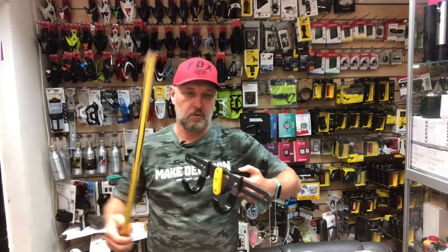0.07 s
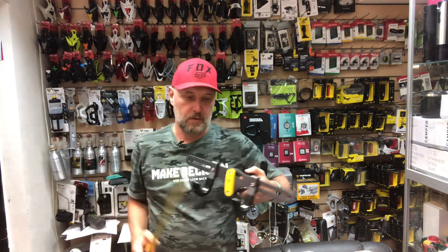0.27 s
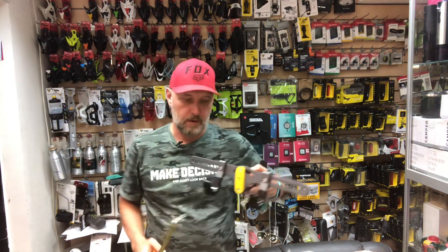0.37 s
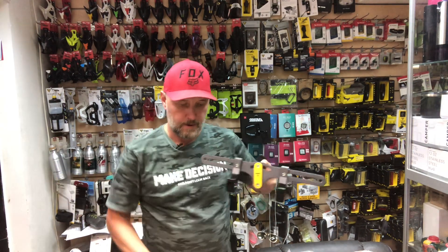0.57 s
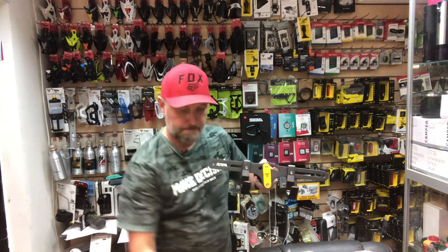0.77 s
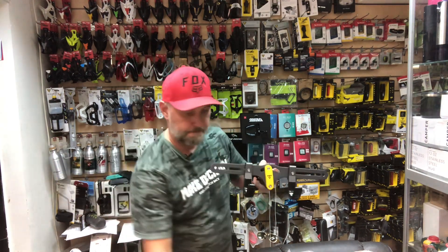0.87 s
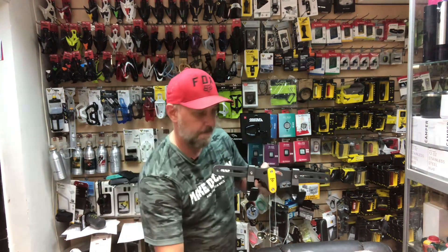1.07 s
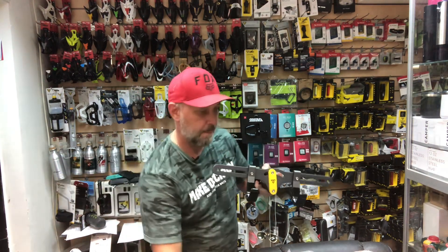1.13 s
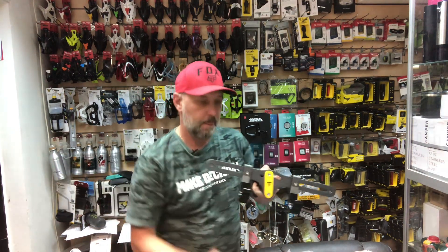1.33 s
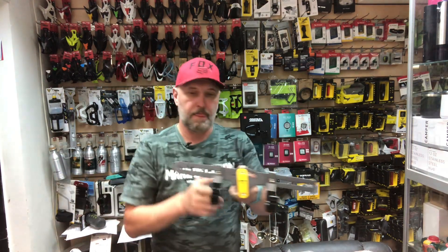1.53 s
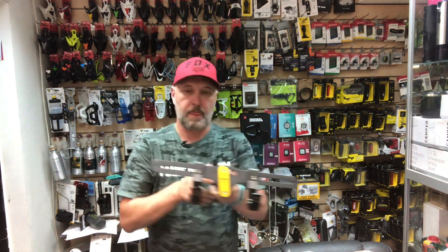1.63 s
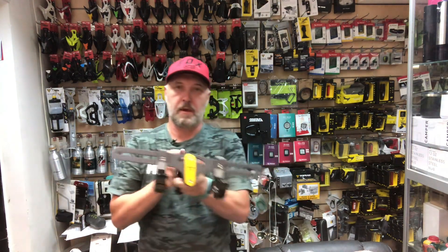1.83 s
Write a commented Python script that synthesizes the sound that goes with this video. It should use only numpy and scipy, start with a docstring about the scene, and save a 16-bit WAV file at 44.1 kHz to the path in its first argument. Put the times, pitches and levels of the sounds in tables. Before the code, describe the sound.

A steel tape measure reels in with a rattling hiss, snaps shut, then knocks on a counter.

```python
"""A steel tape slides into its plastic case as a hiss of tiny clicks, with rattle and slaps.
Its hook snaps home: a few bounces ring the case. Then the case rubs in the hand: grainy noise, a whistle.
It lands on a counter with two booming knocks, made of noise through resonances and a gliding hum.
Last come small metal ticks, squeaks and touches, with soft noise for cloth and fingers.
Throughout, a lapel microphone gives low rumble and a faint hiss of air; a small shop echoes."""
import sys
import numpy as np
from scipy import signal
from scipy.fft import rfft, irfft
from scipy.io import wavfile

SR = 44100
rng = np.random.default_rng(int(sys.argv[2]) if len(sys.argv) > 2 else 0)


def bounce(signal):
    """Save signal as a 16-bit WAV file at the path given by the first command-line argument."""
    frames = np.transpose(np.atleast_2d(signal))
    limited = np.clip(frames, -1, 1)
    pcm = np.round(limited * 32767).astype(np.int16)
    wavfile.write(sys.argv[1], SR, pcm)


def convert_level_to_amplitude(level_db):
    """Map a level in decibels to its linear amplitude factor."""
    exponent = np.asarray(level_db, float) / 20
    return 10 ** exponent


N = 83790  # length in samples, 1.9 s

# In every "colour" table the level is per Hz, and only the shape matters.
# The microphone moves with the body: t/s, sway level/dB, bump level/dB
RUMBLE_LEVELS = [(0.0, -26, -30), (0.052, -35, -47.5), (0.12, -33, -39), (0.222, -31.5, -57),
                 (0.264, -43, -44), (0.502, -44.5, -47), (0.576, -31, -33.5), (0.656, -46, -55),
                 (0.692, -48, -36), (0.724, -62, -45), (0.772, -39.5, -71), (0.894, -52, -45),
                 (0.91, -31, -51), (1.116, -45, -72), (1.174, -57, -32), (1.502, -50.5, -59),
                 (1.634, -25, -44.5), (1.814, -38, -79), (1.9, -40, -74)]
# colour of the sway, then of the bumps: f/Hz, level/dB
SWAY_COLOUR = [(2, -16.5), (6, 5.5), (16, -7.5), (25, -25), (50, -86)]
BUMP_COLOUR = [(12, -41.5), (25, 12), (45, -12), (70, -9.5), (120, -22.5), (300, -66)]
# colour of the air: f/Hz, level/dB
AIR_COLOUR = [(24, -30.5), (40, 2), (135, -11), (663, -21.5), (896, -21), (1680, -36.5), (2320, -28.5),
              (11600, -39.5), (16000, -43)]
AIR_DB = -56

# The blade slides in: t/s, hiss level/dB, top hiss level/dB, case rattle level/dB
REEL_LEVELS = [(0.0, -60, -69, -60), (0.016, -61, -66, -60.5), (0.038, -49, -50.5, -74),
               (0.064, -52.5, -58, -70), (0.098, -42.5, -43.5, -48), (0.108, -40.5, -35.5, -54.5),
               (0.138, -41.5, -40.5, -71), (0.146, -40.5, -43.5, -48.5), (0.17, -42.5, -50.5, -59.5),
               (0.182, -38, -41, -44.5), (0.204, -40, -48, -55.5), (0.234, -41, -39, -41.5),
               (0.25, -43, -48.5, -51), (0.272, -33, -36, -44.5), (0.318, -44, -52.5, -47.5),
               (0.36, -32.5, -36.5, -40), (0.378, -41.5, -54.5, -50), (0.384, -34, -41.5, -37.5),
               (0.426, -33.5, -39, -35.5), (0.466, -42.5, -59, -42), (0.47, -41, -48.5, -40.5)]
REEL_RUNS_ON_S = 0.015  # until the hook arrives
# colours of the hiss, the top hiss and the rattle: f/Hz, level/dB
BLADE_COLOUR = [(1060, -30), (1800, -2.5), (1990, -23.5), (2170, -13), (2490, -10.5), (3360, -9),
                (6740, -2), (10000, -6.5), (13000, -37)]
TOP_HISS_COLOUR = [(6000, -28), (9000, -15), (11000, 3.5), (13200, 0.5), (15500, -6.5), (17000, -46.5)]
RATTLE_COLOUR = [(88, -38), (170, -16), (399, -3), (512, -6), (618, 0.5), (947, -5.5), (1980, -5.5),
                 (3000, -10.5), (3900, -21), (6600, -120)]
GRAINS_PER_S, GRAIN_SPREAD_DB = 7000.0, 3
# The edge of the blade catches and rings; level relative to the hiss
CATCHES_PER_S, CATCHES_DB, CATCH_RING_CYCLES = 500.0, -8.5, 32
# The blade slaps the mouth of the case:
# t/s, peak level of the noise near f/dB, f/Hz, time to fall 60 dB/s, broad noise as a share of it
SLAPS = [(0.032, -37, 7100, 0.23, 0.54), (0.087, -30, 7100, 0.07, 0.67), (0.0965, -38.5, 567, 0.022, .6),
         (0.1055, -23, 7600, 0.0098, 0.65), (0.147, -23, 4300, .015, .2), (0.148, -40, 520, 0.016, .05),
         (0.180, -31.5, 4040, 0.013, 0.31), (0.1915, -29, 4200, 0.0055, 0.35),
         (0.230, -24.5, 7650, 0.074, .6), (0.257, -30.5, 4100, 0.029, 0.405),
         (0.270, -27, 8400, 0.013, 0.95), (0.351, -25, 5500, 0.014, 0.31), (0.357, -20.5, 7300, 0.018, .5),
         (0.3685, -18, 8400, 0.01, .5), (0.385, -19, 5300, 0.01, 0.272), (0.397, -20.5, 6800, 0.025, 0.4),
         (0.4225, -21.5, 6500, 0.013, .5), (0.434, -26, 2310, 0.063, .5), (0.4745, -18, 6500, .025, 0.27)]
CLICK_OVER_PUFF, TAP_RING = 9, 0.3  # click height over noise rms; ring height over that peak

SHOP_T60_S, SHOP_DB, WALL_CUT_HZ = 0.24, -19, 7000

# The hook hits and bounces: t/s, level/dB
BOUNCES = [(0.4837, -16.5), (0.4850, -4), (0.4877, -6.5), (0.4898, -19.5), (0.4932, -15.5), (0.498, -26.5),
           (0.512, -26), (0.520, -28)]
# Ringing tones of case and hook: f/Hz, level/dB, time to fall 60 dB/s
CASE_MODES = [(542.3, 1.5, 0.054), (633, -3.5, 0.12), (882, 1, 0.042), (1050, -4, 0.04), (1326, -3.5, 0.1),
              (1768, -5.5, 0.04), (2277, -12, 0.036), (2522, -6, 0.066), (2790, -9, 0.038),
              (3230, -15.5, 0.023), (4100, -7.5, 0.051), (4700, -13.5, 0.028), (5935, 10, 0.012),
              (7200, -2, .04), (6440, -3, 0.045), (6700, -8.5, 0.051), (7735, -10, 0.057), (8280, -8, 0.12)]
LONGEST_T60_S = 0.08  # longest ring allowed for any tone of the case, so it stays short within the echo
# colour of the snap's noise: f/Hz, level/dB
SNAP_COLOUR = [(88, -56), (150, -27), (612, 3.5), (1140, -10.5), (2500, 0.5), (3160, -12.5), (4080, -1.5),
               (7470, -6), (14000, -14), (16000, -24.5)]
CRACK_DB, CRACK_T60_S = -15.5, 0.013  # level relative to each bounce
TAIL_DB, TAIL_T60_S = -18, 0.15
CHATTER_DB, CHATTER_T60_S = -34, 0.045  # the coiled blade shakes on after the hit
SNAP_LOW_CUT_HZ = 290

# The case rubs in the hand: t/s, rattle level/dB, scrape level/dB
RUB_LEVELS = [(0.53, -42.5, -50), (0.66, -42.5, -51.5), (0.685, -43, -49.5), (0.695, -58, -49),
              (0.72, -56, -52), (0.762, -63, -56.5), (0.786, -77, -81), (0.8, -60.5, -61.5),
              (0.81, -75, -79), (0.86, -81, -82)]
# colours of the rub's rattle and of the scrape: f/Hz, level/dB
RUB_COLOUR = [(200, -12), (400, 1.5), (800, -1.5), (1400, -2), (1800, -8), (4000, -34.5)]
SCRAPE_COLOUR = [(1000, -24), (2500, 2), (4500, 0.5), (5700, -3), (8000, -8.5), (11500, -23), (15500, -23),
                 (17000, -52)]
# The scrape whistles: t/s, level/dB
WHISTLE_LEVELS = [(0.675, -78), (0.69, -49), (0.715, -48.5), (0.735, -55), (0.76, -75)]
# resonances of the whistle: f/Hz, width/Hz, level/dB
WHISTLE_RING = [(5700, 240, 1), (11520, 311, -10.5)]

# Small ticks, as in SLAPS: t/s, peak level/dB, f/Hz, time to fall 60 dB/s, broad share
TICKS = [(0.883, -40.5, 2640, .02, 0.23), (0.893, -43.5, 2620, 0.03, 0.22),
         (0.9085, -26.5, 5000, 0.015, 0.34), (1.114, -38, 7800, 0.011, 0.33),
         (1.158, -25, 5400, 0.017, 0.68), (1.030, -42, 8900, 0.018, .5), (1.197, -28, 7200, 0.058, 0.41),
         (1.471, -42, 2360, 0.0093, 0.15), (1.485, -48, 1500, 0.018, .1), (1.559, -39, 2476, 0.017, 0.51),
         (1.570, -48.5, 810, 0.02, 0.45), (1.689, -41, 1140, 0.035, 0.9), (1.691, -45.5, 2100, 0.035, 0.1),
         (1.7495, -43, 7630, .008, 0.93), (1.764, -42.5, 4800, 0.055, 0.1), (1.7825, -49, 1550, 0.011, 0.9),
         (1.7875, -45.5, 1550, 0.012, 2.9), (1.8315, -47, 1330, 0.0091, 0.23), (1.850, -45, 7500, .01, .3)]

# The case lands and drags on the counter:
# t/s, scuff level/dB, mid knock level/dB, boom level/dB, top hiss level/dB
COUNTER_LEVELS = [(0.9075, -65, -57, -60, -65), (0.910, -38, -36.5, -40, -50),
                  (0.921, -40, -36, -29.5, -54), (0.931, -40, -46, -28.5, -54),
                  (0.979, -55, -52.5, -47.5, -79), (1.007, -54.5, -67, -48.5, -74),
                  (1.019, -46.5, -62, -58, -57), (1.071, -53.5, -45, -57, -71), (1.109, -56, -55, -48, -70),
                  (1.135, -43, -38.5, -58, -57), (1.1565, -60, -53, -44, -63),
                  (1.159, -34, -40.5, -34, -60), (1.183, -39.5, -40.5, -30.5, -53),
                  (1.197, -38, -39, -26, -58), (1.205, -45.5, -44.5, -32.5, -57),
                  (1.243, -58.5, -60, -40.5, -58), (1.273, -61, -58.5, -62, -56.5),
                  (1.359, -64.5, -64.5, -60, -63), (1.445, -69, -63, -55.5, -74), ]
# colours of the scuff and of the top hiss: f/Hz, level/dB
SCUFF_COLOUR = [(710, -32), (1200, -3.5), (1600, -1.5), (2010, -3), (2550, -1), (3350, -3), (5220, -1.5),
                (6320, -4), (6980, -1), (10500, -18.5), (13600, -51)]
COUNTER_HISS_COLOUR = [(5000, -16), (8500, -1.5), (12500, 1.5), (16000, -11)]
# Resonances of the counter, middle then low: f/Hz, width/Hz, level/dB
MID_BODY = [(520, 150, -0.5), (657, 100, -0.5), (942, 135, -2.5), (1550, 150, -12.5), (2130, 190, -13)]
BOOM = [(56.1, 18, 4.5), (95, 35, 0.5), (167, 30, 1), (222.8, 25, 3)]
# The board hums under the case, its pitch gliding down, up at the second knock, then down:
# t/s, f/Hz, level/dB
HUM = [(0.907, 150.7, -41), (0.914, 141, -33), (0.945, 123, -31), (0.975, 108.8, -56), (1.005, 101.6, -65),
       (1.023, 94.4, -35), (1.09, 83, -42), (1.145, 84.7, -40.5), (1.158, 120, -40), (1.177, 123.5, -30.5),
       (1.204, 131.4, -31.5), (1.234, 120, -32), (1.249, 113.5, -61), (1.28, 99.7, -53),
       (1.32, 101.5, -46.5), (1.385, 89, -56.5), (1.419, 90, -77)]
# A metal clip on the case chatters: t/s, level/dB, time to fall 60 dB/s
CLIP_BLOWS = [(0.912, -61.5, 0.21), (1.159, -61.5, 0.25), (1.197, -56.5, 0.057)]
# ringing tones of that clip: f/Hz, level/dB, time to fall 60 dB/s
CLIP_MODES = [(2550, -2, 0.048), (2780, -0.17, 0.033)]
# Corners of the case strike the counter: t/s, level/dB, brightness/dB per octave
KNOCKS = [(0.916, -25.5, 4.5), (0.921, -30, 2), (0.9265, -29, 4), (0.941, -31, -3), (1.126, -36, 1),
          (1.131, -31, -4), (1.135, -27.5, -6), (1.142, -35, 4), (1.162, -31, -5), (1.167, -28.5, 2),
          (1.175, -31, 0), (1.183, -34.5, -7)]

# Squeaky slides of metal on metal: middle t/s, level/dB, half length/s
SLIDES = [(1.138, -60, .014), (1.642, -51, .024)]
# resonances of the slides: f/Hz, width/Hz, level/dB
SLIDE_RING = [(2290, 67, 3.5), (3190, 100, 3), (3735, 90, 4), (5340, 54, -3.5), (6600, 60, -5),
              (8300, 54, -11.5), (8900, 67, -23), (10400, 790, -1.5), (12800, 45, 2)]
# A metal part is touched: t/s, level/dB, length of the contact/s
TOUCHES = [(1.831, -49, 0.002), (1.859, -44.5, 0.0029), (1.8622, -35.5, 0.0046), (1.867, -44.5, 0.0097),
           (1.881, -58, 0.0059)]
# ringing tones of the part: f/Hz, level/dB, time to fall 60 dB/s
METAL_MODES = [(1140, -7, 0.015), (2026, -7, 0.038), (2360, -19, 0.064), (3020, -1.5, 0.059),
               (3680, -6, 0.039), (3940, -4.5, 0.036), (4300, -15, 0.05), (4800, -12.5, 0.058),
               (6800, -14.5, 0.034), (7600, -5, 0.023), (10200, -16, .04)]

# Cloth and fingers: t/s, level/dB
FIDGET_LEVELS = [(1.46, -78), (1.55, -74), (1.578, -54.5), (1.605, -68), (1.645, -51), (1.675, -87),
                 (1.72, -67), (1.75, -64), (1.79, -60), (1.80, -99), (1.85, -69), (1.865, -49), (1.9, -62)]
# their colour: f/Hz, level/dB
FIDGET_COLOUR = [(180, -54.5), (300, -29), (455, -10), (689, -31), (978, 5.5), (2400, 0), (13300, -9.5),
                 (16000, -43)]

OVERLOAD = 0.94  # peaks are rounded off towards this height


def rms_one(x):
    """Scale a sound to rms 1."""
    return x / np.sqrt(np.mean(x ** 2) + 1e-20)


def gains(rows, hold=0):
    """Turn level columns into gains over time; the last row is held for hold seconds."""
    last = rows[-1]
    held = (last[0] + hold + 1e-4, *last[1:])
    times, *columns = np.transpose(list(rows) + [held])
    t = np.arange(N) / SR
    # -120 dB, in effect silence, outside the table
    return [convert_level_to_amplitude(np.interp(t, times, column, left=-120, right=-120)) for column in columns]


def white():
    """Even random noise: all frequencies alike."""
    return rng.standard_normal(N)


def colour(x, points):
    """Shape the spectrum of a sound; rms 1."""
    hz, db = np.transpose(points)
    log_f = np.log(np.fft.rfftfreq(N, 1 / SR) + 1)
    shape = convert_level_to_amplitude(np.interp(log_f, np.log(hz), db))
    return rms_one(irfft(rfft(x) * shape, N))


def grains():
    """Dense random clicks of uneven size, as from rough surfaces."""
    sizes = convert_level_to_amplitude(GRAIN_SPREAD_DB * np.minimum(rng.exponential(1, N), 5))
    signs = rng.choice([-1, 1], N)
    return sizes * signs * (rng.random(N) < GRAINS_PER_S / SR)


def ring(clicks, hz, t60):
    """A resonance: each unit click starts a dying sine of height about 1."""
    r = convert_level_to_amplitude(-60 / (max(t60, 0.002) * SR))
    w = 2 * np.pi * hz / SR
    return signal.lfilter([0, np.sin(w)], [1, -2 * r * np.cos(w), r * r], clicks + 1e-18)


def body(resonances):
    """Noise through several resonances; a wide one dies sooner; rms 1."""
    parts = [convert_level_to_amplitude(db) * rms_one(ring(white(), hz, 2.2 / width)) for hz, width, db in resonances]
    return rms_one(sum(parts))


def dying(s, t60):
    """A level that jumps to 1 at s and then dies away."""
    t = np.arange(N) / SR - s
    return (t >= 0) * convert_level_to_amplitude(-60 * np.maximum(t, 0) / max(t60, 0.002))


def band(x, low, high):
    """Keep one band of a sound."""
    return signal.sosfilt(signal.butter(2, [low, min(high, 15000)], "band", fs=SR, output="sos"), x)


def taps(rows, octaves):
    """Each tap: a click and dying noise near its pitch, a pure ring, and a broader part."""
    out, noise = np.zeros(N), white()
    for s, db, hz, t60, broad in rows:
        i = int(s * SR)
        puff = (noise * dying(s, t60))[i:i + 8192]
        puff[1] += CLICK_OVER_PUFF
        tone = band(puff, hz / 2 ** octaves, hz * 2 ** octaves)
        wide = band(puff, hz / 2, 4 * hz)
        tap = tone / abs(tone).max()
        tap += TAP_RING * ring(signal.unit_impulse(len(puff)), hz, t60)
        tap += max(broad, 0) * wide / abs(wide).max()
        out[i:i + 8192] += convert_level_to_amplitude(db) * tap
    return out


def rumble():
    """The microphone moves with the body: slow sway and low bumps, made of deep noise."""
    sway, bump = gains(RUMBLE_LEVELS)
    return sway * colour(white(), SWAY_COLOUR) + bump * colour(white(), BUMP_COLOUR)


def air():
    """A steady, faint background noise."""
    return convert_level_to_amplitude(AIR_DB) * colour(white(), AIR_COLOUR)


def blade_catches():
    """Sparse uneven clicks, each ringing one of 16 short blade resonances; rms 1."""
    clicks = grains() * (rng.random(N) < CATCHES_PER_S / GRAINS_PER_S)
    pitches = np.geomspace(3200, 9000, 16)
    dealt = rng.integers(0, 16, N)  # which resonance each click rings
    return rms_one(sum(ring(clicks * (dealt == k), hz, CATCH_RING_CYCLES / hz)
                       for k, hz in enumerate(pitches)))


def reel():
    """The sliding blade: grainy hiss with ringing catches, and rattle of the case."""
    hiss, top, rattle = gains(REEL_LEVELS, REEL_RUNS_ON_S)
    blade = colour(grains(), BLADE_COLOUR) + convert_level_to_amplitude(CATCHES_DB) * blade_catches()
    return (hiss * blade + top * colour(grains(), TOP_HISS_COLOUR)
            + rattle * colour(grains(), RATTLE_COLOUR))


def shop(x):
    """Echo of the room: the sound smeared by dulled noise that dies away."""
    t = np.arange(int(0.8 * SR)) / SR
    tail = rng.standard_normal(len(t)) * convert_level_to_amplitude(-60 * t / SHOP_T60_S)
    tail *= t > 0.008  # the echo starts a little late
    tail = signal.sosfilt(signal.butter(1, WALL_CUT_HZ, fs=SR, output="sos"), tail)
    return convert_level_to_amplitude(SHOP_DB) * signal.fftconvolve(x, tail / np.sqrt(np.sum(tail ** 2)))[:N]


def slaps():
    """The blade slaps the mouth of the case: short clicks with a pitch and ring."""
    return taps(SLAPS, octaves=0.28)


def snap():
    """Bounces of the hook ring the case, each with a crack of noise; a noise tail follows."""
    out = np.zeros(N)
    luck = rng.normal(0, 1.5, (len(BOUNCES), len(CASE_MODES)))  # dB
    for k, (hz, mode_db, t60) in enumerate(CASE_MODES):
        clicks = np.zeros(N)
        for (s, db), luck_db in zip(BOUNCES, luck[:, k]):
            clicks[int(s * SR)] = convert_level_to_amplitude(db + mode_db + luck_db - 12)
        clicks += convert_level_to_amplitude(mode_db + CHATTER_DB) * dying(BOUNCES[1][0], CHATTER_T60_S) * grains()
        out += (-1) ** k * ring(clicks, hz, min(t60, LONGEST_T60_S))
    cracks = sum(convert_level_to_amplitude(db + CRACK_DB) * dying(s, CRACK_T60_S) for s, db in BOUNCES)
    tail = convert_level_to_amplitude(TAIL_DB) * dying(BOUNCES[0][0], TAIL_T60_S)
    out = out + (cracks + tail) * colour(white(), SNAP_COLOUR)
    return signal.sosfilt(signal.butter(3, SNAP_LOW_CUT_HZ, "high", fs=SR, output="sos"), out)


def rub():
    """The case rubs in the hand: grainy rattle and scrape, with a whistle of narrow resonances."""
    rattle, scrape = gains(RUB_LEVELS)
    whistle = gains(WHISTLE_LEVELS)[0]
    return (rattle * colour(grains(), RUB_COLOUR) + scrape * colour(grains(), SCRAPE_COLOUR)
            + whistle * body(WHISTLE_RING))


def ticks():
    """Small parts tick: short clicks, each with a pitch and ring of its own."""
    return taps(TICKS, octaves=0.35)


def board_hum():
    """The board hums: one sine whose pitch and level glide."""
    s, hz, db = np.transpose(HUM)
    pitch = np.interp(np.arange(N) / SR, s, hz)
    cycles = np.cumsum(pitch) / SR + rng.random()
    return gains(list(zip(s, db)))[0] * np.sqrt(2) * np.sin(2 * np.pi * cycles)


def clip_chatter():
    """A metal clip chatters: dying noise rings its two tones."""
    chatter = sum(convert_level_to_amplitude(db) * dying(s, t60) for s, db, t60 in CLIP_BLOWS)
    return sum(convert_level_to_amplitude(db) * ring(chatter * white(), hz, t60) for hz, db, t60 in CLIP_MODES)


def knocks():
    """Each corner blow rings the counter's resonances with strengths of its own."""
    s, db, tilt_db = np.transpose(KNOCKS)
    luck = rng.normal(0, 3.3, (len(s), len(MID_BODY)))  # dB
    out = 0
    for k, (hz, width, mode_db) in enumerate(MID_BODY):
        octaves_up = np.log2(hz / MID_BODY[1][0])
        clicks = np.zeros(N)
        clicks[(s * SR).astype(int)] = convert_level_to_amplitude(db + mode_db + luck[:, k] + tilt_db * octaves_up)
        out = out + (-1) ** k * ring(clicks, hz, 2.2 / width)
    return out


def counter():
    """The case on the counter: scuff, top hiss, knocks, resonant boom, hum and clip."""
    scuff, mid, boom, top = gains(COUNTER_LEVELS)
    tones = board_hum() + clip_chatter()
    noise = scuff * colour(grains(), SCUFF_COLOUR) + top * colour(white(), COUNTER_HISS_COLOUR)
    return tones + noise + knocks() + mid * body(MID_BODY) + boom * body(BOOM)


def metal():
    """Squeaky slides swell and fade in their resonances; short contacts ring a small metal part."""
    t = np.arange(N) / SR
    swell = sum(convert_level_to_amplitude(db) * np.exp(-((t - s) / half) ** 4) for s, db, half in SLIDES)
    # a longer contact pushes less hard, so its energy stays the same
    push = sum(convert_level_to_amplitude(db) * (t >= s) * (t < s + length) / np.sqrt(length * SR)
               for s, db, length in TOUCHES)
    rings = sum(convert_level_to_amplitude(db) * ring(push * white(), hz, t60) for hz, db, t60 in METAL_MODES)
    return swell * body(SLIDE_RING) + rings + 4.4 * push * colour(grains(), SCUFF_COLOUR)


def fidget():
    """Cloth and fingers: soft grainy noise that comes and goes."""
    return gains(FIDGET_LEVELS)[0] * colour(grains(), FIDGET_COLOUR)


def scene():
    """All near sounds with their echo, plus rumble and air."""
    near = ticks() + reel() + rub() + slaps() + snap() + counter() + metal() + fidget()
    background = rumble() + air()
    return (near + shop(near) + background)[None]


def band_limit(x):
    """A steep low-pass at the top of the band."""
    return signal.sosfilt(signal.butter(12, 16330, fs=SR, output="sos"), x)


def record(dry):
    """Round off the peaks, then cut the treble above 15900 Hz."""
    rounded = dry / (1 + (dry / OVERLOAD) ** 6) ** (1 / 6)
    treble_cut = signal.ellip(10, 0.5, 70, 15900, fs=SR, output="sos")
    mix = signal.sosfilt(treble_cut, rounded)
    return band_limit(mix)


dry = scene()
out = record(dry)
bounce(out)
```